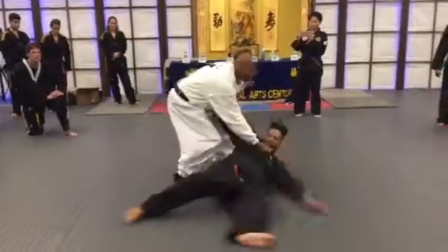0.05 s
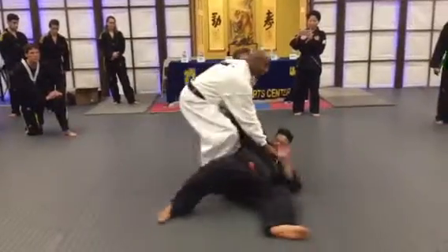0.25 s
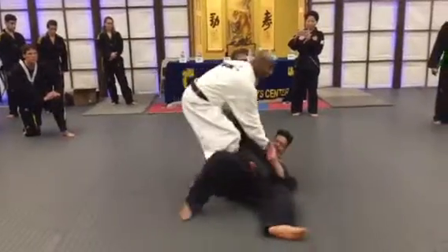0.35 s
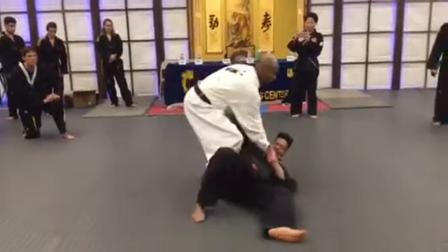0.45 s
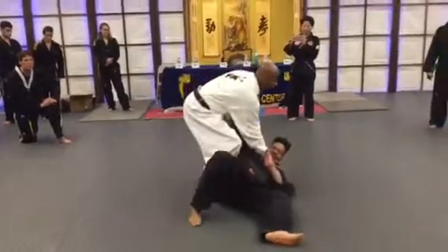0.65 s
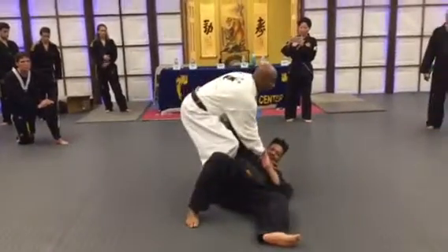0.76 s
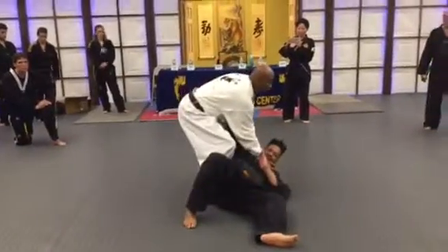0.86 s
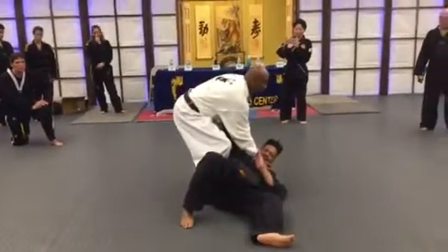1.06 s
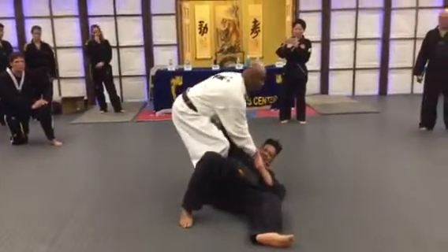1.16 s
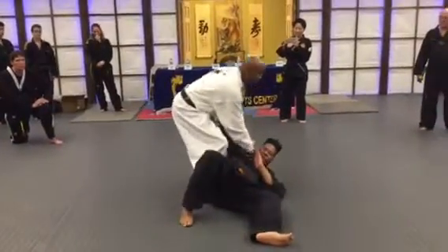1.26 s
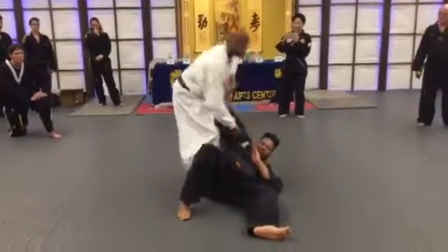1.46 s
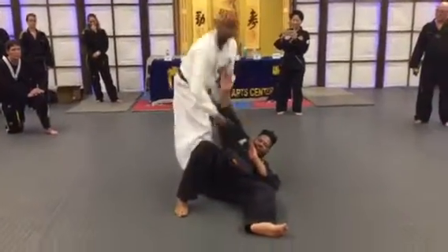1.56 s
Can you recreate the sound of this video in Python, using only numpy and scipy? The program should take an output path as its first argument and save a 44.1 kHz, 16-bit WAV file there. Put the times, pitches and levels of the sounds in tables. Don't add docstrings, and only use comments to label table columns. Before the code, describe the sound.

A brief cloth shuffle, then a body hits a padded mat with a cracking arm slap and loud low thump, overloading a small microphone; echoes fade in a hard-walled hall, with faint foot taps later.

```python
import sys
import numpy as np
from scipy import signal
from scipy.fft import rfft, irfft
from scipy.io import wavfile
from scipy.ndimage import uniform_filter1d

SR = 44100
rng = np.random.default_rng(int(sys.argv[2]) if len(sys.argv) > 2 else 0)


def natural_amplitude(level_db):
    exponent = np.asarray(level_db, float) / 20
    return 10 ** exponent


def materialize(psi):
    bounded = np.clip(np.atleast_2d(psi).T, -1, 1)
    quanta = np.round(bounded * 32767).astype(np.int16)
    wavfile.write(sys.argv[1], SR, quanta)


N = 70560


def read(points, hz):
    f, value = np.transpose(points)
    return np.interp(np.log(hz + 1), np.log(f + 1), value)


def curve(points):
    return np.interp(np.arange(N) / SR, *np.transpose(points))


def evened(x):
    return x / np.sqrt(np.mean(x ** 2) + 1e-20)


def coloured(x, points):
    gain = natural_amplitude(read(points, np.fft.rfftfreq(len(x), 1 / SR)))
    return irfft(rfft(x) * gain, len(x))


def noise_burst(length, points):
    return evened(coloured(rng.standard_normal(length), points))


def add(mix, s, sound):
    part = mix[round(s * SR):][:len(sound)]
    part += sound[:len(part)]


def ring(hz, t60, rise):
    t = np.arange(SR // 3) / SR
    return np.minimum(t / rise, 1) * natural_amplitude(-60 * t / t60) * np.sin(2 * np.pi * hz * t)


def air():
    # pitch_hz [Hz], level_db [dB per Hz]
    wash = [(25, -46), (42, -22.5), (60, -5.5), (150, -9.5), (500, -29), (900, -30.5), (3220, -35),
            (16000, -52)]
    # pitch_hz [Hz], level_db [dB rms]
    hum = [(59.2, -54.5), (120, -65), (296, -78.5), (683.7, -77.5), (710.6, -76)]
    t = np.arange(N) / SR
    out = natural_amplitude(-59.5) * noise_burst(N, wash)
    for hz, db in hum:
        waver = evened(uniform_filter1d(rng.standard_normal(N), size=4000))
        level = np.sqrt(2) * natural_amplitude(db + 0.5 * waver)
        out = out + level * np.sin(2 * np.pi * (hz * t + rng.random()))
    return out


def cloth():
    # pitch_hz [Hz], level_db [dB per Hz]
    shuffle = [(24, -42.5), (40, -17.5), (140, -6.5), (269, -3.5), (503, -14.5), (663, -6), (4800, -27.5),
               (8550, -32.5), (16000, -41)]
    # time_s [s], level_db [dB]
    shuffle_level = [(0, -43), (.02, -43), (.07, -46.5), (.118, -39), (.14, -42.5), (.178, -45.5),
                     (.184, -35), (.19, -26), (.202, -33)]
    # time_s [s], level_db [dB]
    swish = [(0, -68), (.03, -77), (.078, -72), (.092, -48), (.13, -67), (.175, -64), (.19, -46), (.3, -70),
             (.578, -65), (.602, -85), (1.3, -95), (1.42, -72), (1.6, -89)]
    strength_db = 1.8 * np.repeat(rng.exponential(1, N // 40 + 1), 40)[:N]
    grains = rng.standard_normal(N) * natural_amplitude(strength_db)
    stop = np.exp(-np.maximum(np.arange(N) / SR - .203, 0) / 0.012)
    drag = natural_amplitude(1.5) * natural_amplitude(curve(shuffle_level)) * stop * evened(coloured(grains, shuffle))
    highpass = signal.butter(2, 3970, "high", fs=SR, output="sos")
    hiss = evened(signal.sosfilt(highpass, rng.standard_normal(N)))
    return drag + natural_amplitude(curve(swish)) * hiss


def touches():
    # start_s [s], level_db [dB], pitch_hz [Hz]
    limbs = [(.1885, -26, 480), (.1925, -23, 300), (.1972, -17, 200), (.004, -34, 300), (.03, -37, 280),
             (.068, -37, 290)]
    # start_s [s], level_db [dB], pitch_hz [Hz]
    taps = [(0.954, -57.5, 880), (.99, -49.5, 886), (.99, -42, 300.4), (1.266, -56.5, 705),
            (1.27, -56, 292), (1.268, -58, 990)]
    # pitch_hz [Hz], level_db [dB per Hz]
    grit = [(100, -17), (300, -4), (1200, 7), (3000, -15), (6000, -24)]
    grit_db, grit_s = -14, .005
    out = np.zeros(N)
    t = np.arange(1500) / SR
    for s, db, hz in limbs:
        add(out, s, natural_amplitude(db) * ring(hz, .035, .001))
    grit_shape = t / grit_s * np.exp(-t / grit_s)
    for s, db, hz in taps:
        knock = ring(hz, 0.056, 0.0046) + 0.17 * ring(0.82 * hz, .04, .003)
        add(out, s, natural_amplitude(db) * knock)
        add(out, s, natural_amplitude(db + grit_db) * grit_shape * noise_burst(1500, grit))
    return out


def slap():
    # pitch_hz [Hz], level_db [dB per Hz]
    burst = [(400, -11.5), (600, -3), (1000, -13.5), (1500, -6.5), (2300, -6), (3200, -7), (4700, -6),
             (16000, -20.5)]
    # start_s [s], level_db [dB against the slap]
    echoes = [(0.2278, -5.5), (.2325, -9.5), (.2368, -5.5), (.2455, -36), (.2525, -40), (.2647, -7.5),
              (.2690, -11), (.2745, -9.5), (.3011, -12), (.3110, -12.5), (.3320, -14), (.3385, -12),
              (0.383, -24), (0.427, -30)]
    # pitch_hz [Hz], level_db [dB]
    wall = [(400, -26.5), (1200, -18.5), (1900, 9), (3500, -10), (6000, -14), (16000, -32.5)]
    start_s, level_db = .2053, -7.5
    hold_s, fade_s = 0.0013, .0012
    spray_db, spray_s = -18, .006
    out = np.zeros(N)
    t = np.arange(800) / SR
    shape = np.exp(-np.maximum(t - hold_s, 0) / fade_s)
    spray = natural_amplitude(spray_db) * np.exp(-t / spray_s)
    add(out, start_s, natural_amplitude(level_db) * (shape + spray) * noise_burst(800, burst))
    soft_shape = shape * np.minimum(t / 0.0028, 1)
    for s, db in echoes:
        add(out, s, natural_amplitude(level_db + db) * soft_shape * noise_burst(800, wall))
    return out


def thump():
    # pitch_hz [Hz], level_db [dB], t60_s [s to fall 60 dB]
    floor_modes = [(80, -16, 0.39), (120, -12.5, 0.055), (257, -12.5, 0.16), (488, -16.5, 0.038),
                   (615, -11.5, 0.082)]
    # start_s [s], level_db [dB], pitch_hz [Hz]
    echoes = [(0.2284, -8, 173.7), (0.246, -14, 151), (0.263, -18.5, 202), (.283, -8.5, 167.5),
              (.312, -13.5, 160), (0.329, -12, 147), (.360, -13.5, 194.2), (0.376, -16.5, 133),
              (.388, -27.5, 221.6), (.428, -16, 190.7), (0.466, -22, 149.7), (.478, -26, 224.8),
              (.51, -31.5, 80), (.545, -22.5, 156), (0.573, -26, 139), (0.611, -30, 186),
              (.645, -27, 158.2), (.675, -27, 181.3), (0.699, -29.5, 193), (.74, -36.5, 153),
              (0.254, -12.5, 89.6), (0.308, -26.5, 75.6)]
    start_s, level_db = .2072, 2.5
    rise_s, hold_s, t60_s = 0.0027, 0.0096, 0.05
    pitch_hz, stiff_hz, sag_s = 155.9, 124, .004
    return_rise_s, return_t60_s = 0.004, 0.11
    out = np.zeros(N)
    t = np.arange(SR // 5) / SR
    turns = np.cumsum(pitch_hz + stiff_hz * np.exp(-t / sag_s)) / SR
    shape = np.minimum(t / rise_s, 1) * natural_amplitude(-60 * np.maximum(t - hold_s, 0) / t60_s)
    add(out, start_s, natural_amplitude(level_db) * shape * np.sin(2 * np.pi * turns))
    for hz, db, t60 in floor_modes:
        add(out, start_s, natural_amplitude(db) * ring(hz, t60, 0.006))
    for s, db, hz in echoes:
        low = ring(hz, return_t60_s, return_rise_s)
        high = 0.39 * ring(1.3 * hz, 0.21, return_rise_s)
        add(out, s, natural_amplitude(db) * (low + high))
    return out


def hall():
    # pitch_hz [Hz], t60_s [s to fall 60 dB]
    fading = [(50, 1.2), (150, 2.1), (450, .9), (750, 0.74), (2200, 1.4), (3800, 1.2), (8000, 0.8),
              (14000, .6)]
    # pitch_hz [Hz], level_db [dB per Hz]
    dark = [(30, -31.5), (60, -20.5), (170, -11), (300, -15.5), (500, -22), (750, -38.5), (1100, -49.5),
            (3000, -90.5)]
    # pitch_hz [Hz], level_db [dB per Hz]
    bright = [(400, -61), (900, -33), (1600, -31.5), (1900, -25.5), (4000, -31.5), (5200, -38.5),
              (9000, -46), (16000, -62)]
    # time_s [s], level_db [dB]
    recovery = [(.2, -2.5), (.3, 0.5), (.5, 2.5), (.72, 4.5), (.82, 1.5), (1.1, -4.5), (1.6, -22)]
    start_s, rise_s, level_db, patch_db = 0.2104, .025, -34, 1.2
    gate_s, gate_fall_s, gate_hz, gate_db = 0.59, .025, 9600, -18
    frames, hz = N // 128 + 5, np.fft.rfftfreq(512, 1 / SR)
    a, b, patches = rng.standard_normal((frames, 257, 3)).T
    patches = uniform_filter1d(patches, size=8, axis=0)
    patches = evened(uniform_filter1d(patches, size=6, axis=1))
    z = (a + 1j * b) * natural_amplitude(patch_db * patches)
    t = np.maximum(np.arange(frames) * 128 / SR - .4, -.2)
    gain = natural_amplitude(-60 * t / read(fading, hz)[:, None]) * (np.arange(frames) > 40)
    closing = np.clip((t + 0.396 - gate_s) / gate_fall_s, 0, 1)
    shut = closing / (1 + (gate_hz / (hz[:, None] + 1)) ** 6)
    gain = gain * natural_amplitude(gate_db * shut)
    steady = signal.istft(z, nperseg=512, noverlap=384)[1][:N]
    dying = signal.istft(z * gain, nperseg=512, noverlap=384)[1][:N]
    tail = (coloured(dying, dark) + coloured(dying, bright)) / np.std(coloured(steady, dark))
    swell = np.clip((np.arange(N) / SR - start_s) / rise_s, 0, 1)
    return natural_amplitude(level_db + curve(recovery)) * tail * swell


def scene():
    return (air() + cloth() + touches() + slap() + thump() + hall())[None]


def band_limit(x):
    return signal.sosfilt(signal.butter(12, 16640, fs=SR, output="sos"), x)


def record(dry):
    ceiling, knee = .71, 6
    clipped = dry / (1 + abs(dry / ceiling) ** knee) ** (1 / knee)
    lowpass = signal.firwin(255, 16000, fs=SR)[None]
    finished = signal.oaconvolve(clipped, lowpass, "same")
    return band_limit(finished)


dry = scene()
out = record(dry)
materialize(out)
```